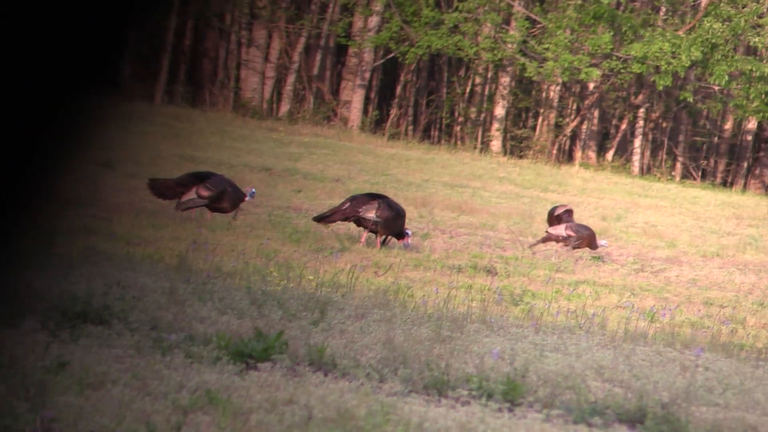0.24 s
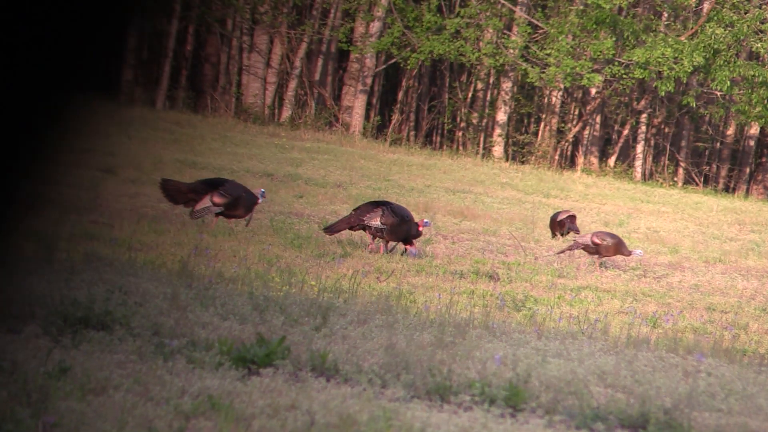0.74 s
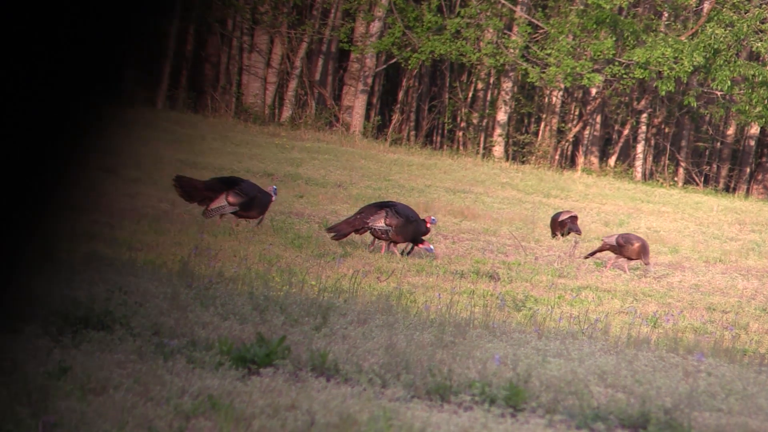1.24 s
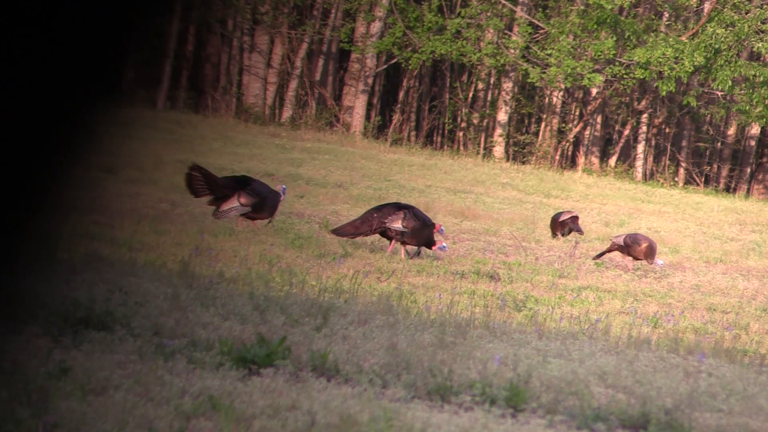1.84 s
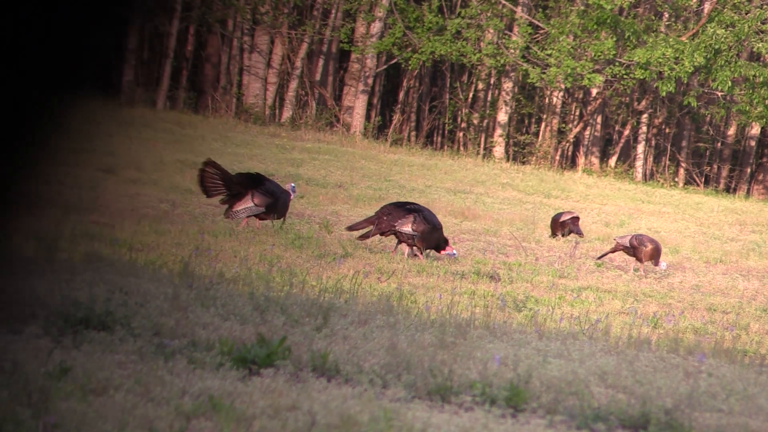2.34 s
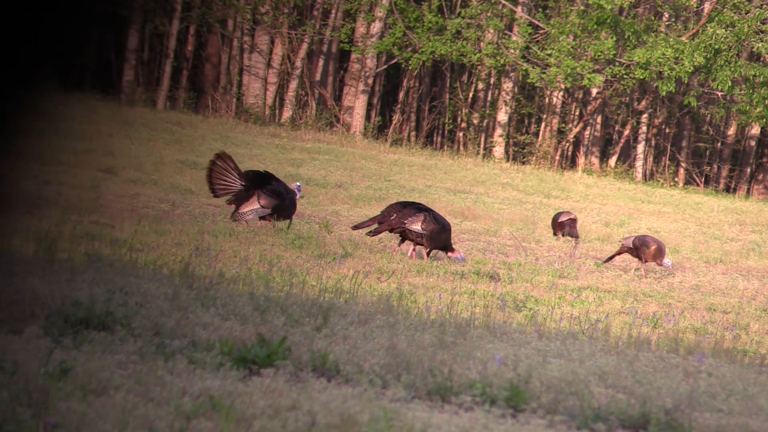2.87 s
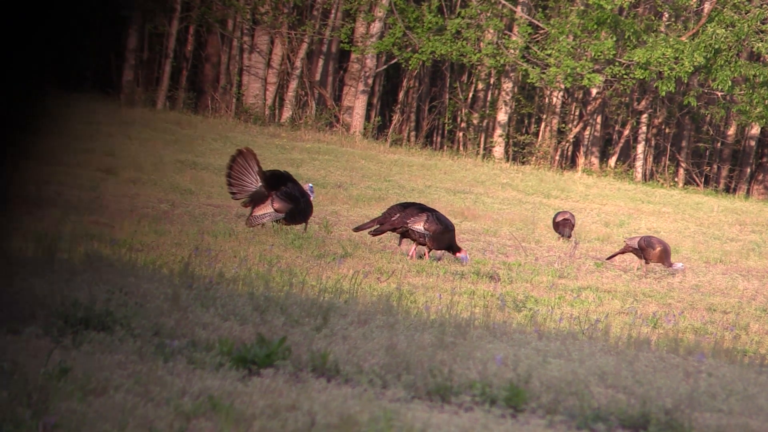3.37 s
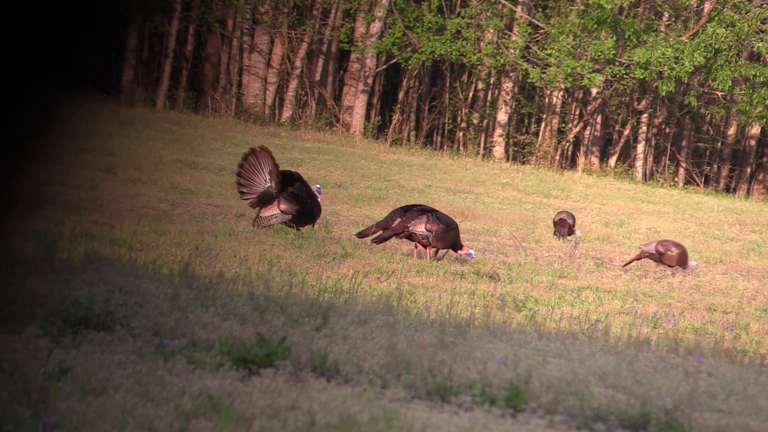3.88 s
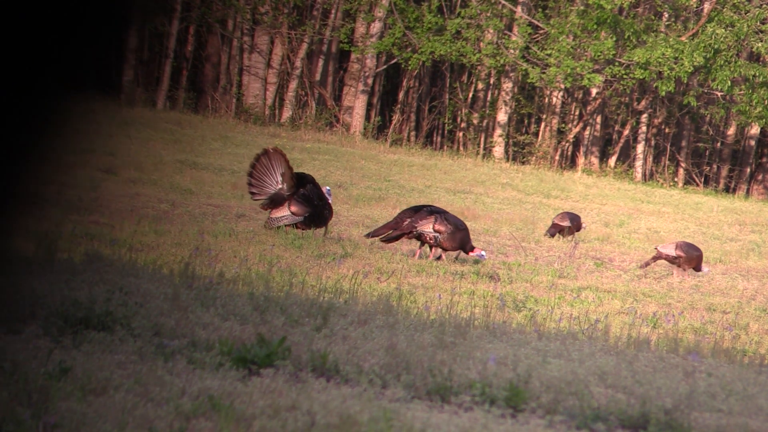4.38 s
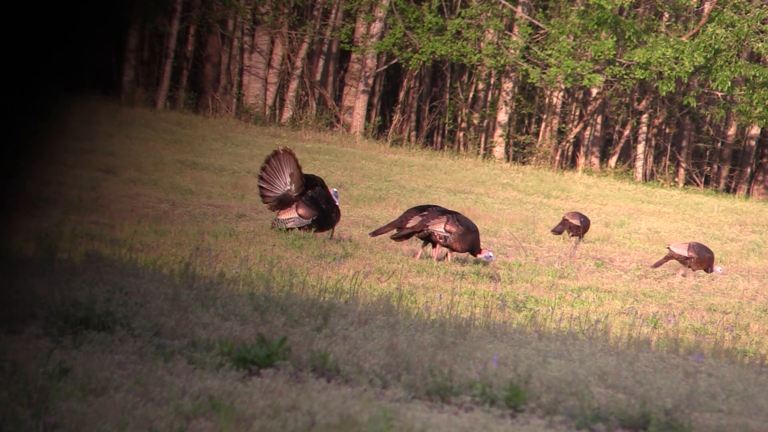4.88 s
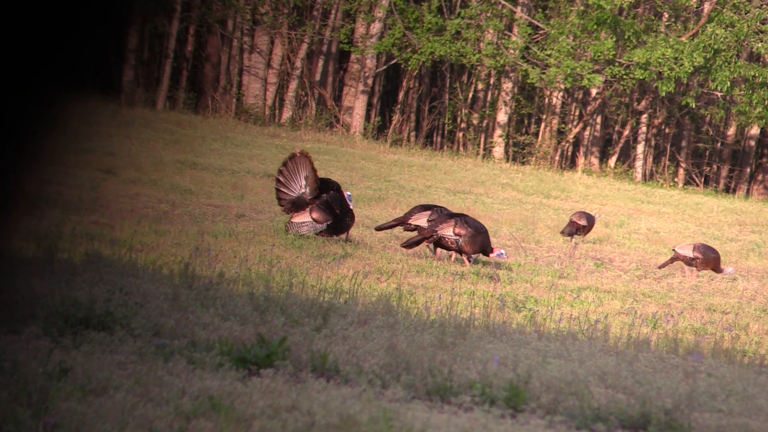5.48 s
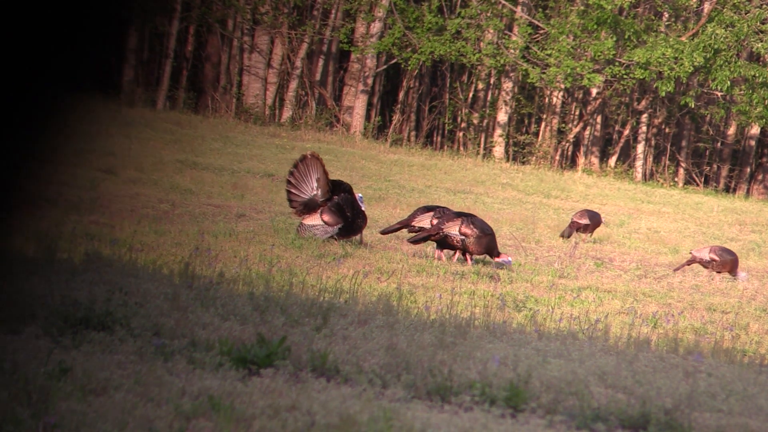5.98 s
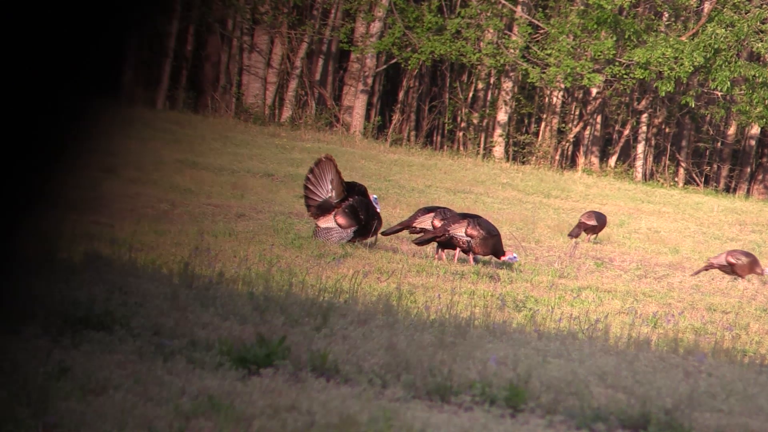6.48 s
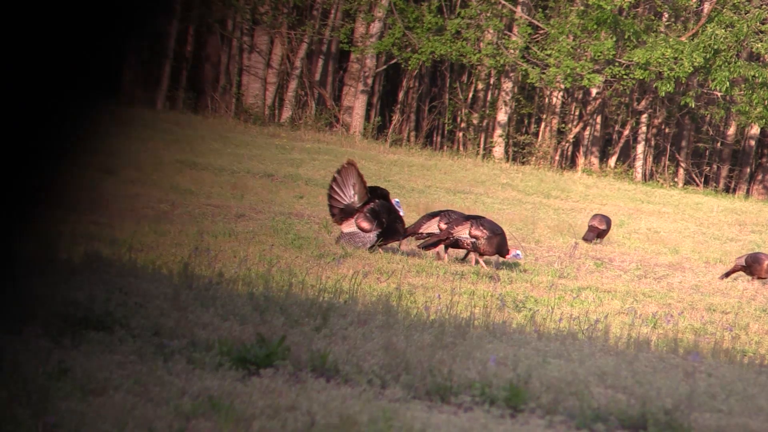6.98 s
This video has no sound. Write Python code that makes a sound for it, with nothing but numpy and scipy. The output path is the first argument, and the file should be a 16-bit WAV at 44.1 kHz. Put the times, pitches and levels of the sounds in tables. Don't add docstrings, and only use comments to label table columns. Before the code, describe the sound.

Quiet rustling and taps, then a loud clattering wooden turkey gobble, a brief two-tone yelp, and faint birds chirping far off.

```python
import sys
import numpy as np
from scipy import signal
from scipy.fft import rfft, irfft
from scipy.io import wavfile

SR = 44100
rng = np.random.default_rng(int(sys.argv[2]) if len(sys.argv) > 2 else 0)


def volts(x):
    e = np.asarray(x, float) / 20
    return 10 ** e


def master(y):
    cut = np.clip(np.atleast_2d(y).T, -1, 1)
    pcm = np.round(cut * 32767)
    wavfile.write(sys.argv[1], SR, pcm.astype(np.int16))


N = 318402
T, HZ = np.arange(N) / SR, np.maximum(np.fft.rfftfreq(N, 1 / SR), 1)


def rms_one(x):
    return x / np.sqrt(np.mean(x ** 2) + 1e-20)


def at_hz(points, hz):
    point_hz, value = np.array(points).T
    return np.interp(np.log(hz), np.log(np.maximum(point_hz, 1)), value)


def drift(rate_hz):
    return rms_one(irfft(rfft(rng.standard_normal(N)) / (1 + (HZ / rate_hz) ** 2), N))


def filtered(x, order, hz, kind):
    return signal.sosfilt(signal.butter(order, hz, kind, fs=SR, output="sos"), x)


def ring(drive, hz, t60_s):
    r, w = volts(-60 / (t60_s * SR)), 2 * np.pi * hz / SR
    return signal.lfilter([0, np.sin(w)], [1, -2 * r * np.cos(w), r * r], drive + 1e-18)


def body(drive, modes):
    click = np.zeros(N)
    click[0] = 1
    rings = [(-1) ** k * volts(db) * ring(click, hz, t60_s) for k, (hz, db, t60_s) in enumerate(modes)]
    response = sum(rings)[:SR // 5]
    return signal.oaconvolve(drive, response[None] / np.linalg.norm(response), axes=1)[:, :N]


def coloured(spectrum, alike):
    mid, side = rfft(rng.standard_normal((2, N))) * volts(at_hz(spectrum, HZ))
    alike = np.clip(alike, -1, 1)
    return rms_one(irfft(np.sqrt(1 + alike) * mid + np.sqrt(1 - alike) * side * [[1], [-1]], N))


def bursts(times_s, levels_db, decay_s):
    clicks = np.zeros(N)
    clicks[(np.array(times_s) * SR).astype(int)] = volts(np.array(levels_db))
    return signal.lfilter([1], [1, -np.exp(-1 / (decay_s * SR))], clicks + 1e-18)


def grit(spread_db, shared):
    sizes = volts(spread_db * np.minimum(rng.exponential(1, N), 5))
    common, left, right = rng.standard_normal((3, N))
    shared = np.clip(shared, 0, 1)
    return rms_one(sizes * (shared * common + (1 - shared) * np.array([left, right])))


# (time [s], peak [dB], low modes [dB], brightness [dB])
CLACKS = [(1.5906, -8.5, -13, -18.5), (1.6419, -4.5, -17, -19), (1.708, -7.5, -10, -23.5),
          (1.7964, -8, -10.5, -18.5), (1.9083, -6, -11, -21), (1.994, -3.5, -9.5, -20),
          (2.098, -8.5, -11.5, -25), (2.176, -8, -12.5, -13), (2.2717, -9, -12.5, -15),
          (2.3352, -10.5, -10, -8.5), (2.432, -13.5, -14, -24.5), (2.4932, -8.5, -22.5, -11.5),
          (2.587, -8.5, -12, -17.5), (2.6411, -10.5, -13.5, -9.5), (2.7254, -10, -19, -25.5),
          (2.7448, -22.5, -19.5, -21), (2.7908, -10.5, -28.5, -13.5), (2.8859, -11.5, -10, -18.5),
          (2.9319, -8, -18, -15), (3.0254, -15.5, -19, -24), (3.077, -6, -13.5, -16.5),
          (3.161, -10.5, -15, -33), (3.187, -24, -19, -24.5), (3.2311, -4.5, -11, -24),
          (4.8975, -30.5, -48, -12.5)]
THIN_WALL_DB = [-3.0, -2.5, -3.0, -3.0, 5.0, -5.0, 5, 6.0, 6.0, -5.0, 2, 5.0, 3.5, 9.0, -1.5, 1.5, 8.0, 1.5,
                1.5, -1.5, 3.0, 4.5, -4.0, 10.0, 0.1]
UPPER_DB = [3.0, 3.0, 1.5, 1.5, 1.5, 3.0, 3.0, 3.0, 1.5, 1.5, -1.5, 1.5, 1.5, 3.0, 1.5, -4, 3.0, 1.5, 1.5,
            -2.5, 1.5, 1.5, -1.5, 3.0, 0]
# (frequency [Hz], level [dB], t60 [s])
LOW_MODES = [(613, -14.5, 0.03), (916, -1, 0.042), (1062, 1.5, 0.0339), (1262.6, 3.5, 0.048)]
# (frequency [Hz], level [dB], t60 [s])
HIGH_MODES = [(1518, -6, 0.044), (1760, -2.5, 0.031), (2275, -6, 0.03), (2604, -1, 0.016),
              (2900, -2, 0.023), (3380, -8.5, 0.016), (4088, -12, .022), (4440, -13, 0.028),
              (4960, -15.5, .03), (7660, -9, 0.012), (8400, -12, 0.0062)]
# (frequency [Hz], density [dB per Hz])
CRACK = [(150, -71.5), (250, -40.5), (421, -27), (710, -24), (1010, -4), (1280, -9.5), (1400, -11.5),
         (2860, -15.5), (3770, -30), (7840, -37.5), (12100, -47), (16000, -64.5)]


def clacks():
    s, high_db, low_db, bright_db = np.transpose(CLACKS)
    low_chatter, high_chatter = grit(3.0, shared=0.92), grit(1.8, shared=0.57)

    def struck(db, chatter, chatter_db, chatter_s, hit_db, hit_s, modes):
        return body(bursts(s, db + chatter_db, chatter_s) * chatter + bursts(s, db + hit_db, hit_s), modes)

    thin_db, upper_db = np.array(THIN_WALL_DB) / 2, np.array(UPPER_DB) / 2
    thick = struck(low_db - thin_db, low_chatter, -2.5, 0.008, 2.0, .0001, LOW_MODES[:3])
    thin = struck(low_db + thin_db, low_chatter, 0.3, 0.006, 7.5, .0001, LOW_MODES[3:])
    middle = struck(high_db - upper_db, high_chatter, -7.5, .011, 0.3, .00005, HIGH_MODES[:3])
    upper = struck(high_db + upper_db, high_chatter, -7.0, .0065, 1.5, .00005, HIGH_MODES[3:])
    low = filtered(thick + thin, 2, [640, 3000], "band")
    high = filtered(middle + upper, 3, [900, 9500], "band")

    crack = bursts(s, high_db + bright_db + 0.5, 0.0093) * coloured(CRACK + [(22000, -99)], 0.68)
    top = filtered(crack, 2, 4500, "high")
    return low + high + filtered(crack, 1, 1300, "high") * volts(12.5) + top * volts(18.5)


# (loudest time [s], squeal [dB], rise [ms], fall [ms], pitch [Hz])
STROKES = [(1.6872, -10, 11.5, 6.5, 1040), (1.763, -12.5, 8.75, 11.1, 1138), (1.8621, -7, 10.8, 9.2, 1038),
           (1.959, -8.5, 10, 7.6, 1052), (2.0548, -7.5, 12, 7.7, 1014), (2.1336, -14.5, 6.0, 5.0, 1010),
           (2.152, -8, 9.0, 8.0, 1070), (2.2274, -6.5, 10.04, 8.3, 1015), (2.3038, -14.5, 9.4, 4.4, 1110),
           (2.3873, -6, 10.2, 10.1, 1020), (2.4679, -12.5, 5.26, 10.0, 1166), (2.5395, -7, 8.6, 6.5, 1030),
           (2.6867, -6.5, 10.1, 14.5, 1001), (2.8274, -10, 5.8, 10.1, 1030),
           (2.9087, -12.5, 6.66, 9.4, 996), (2.9427, -13.5, 9.8, 7.04, 1119),
           (3.0552, -12, 4.72, 11.1, 1013), (3.12, -9, 9.5, 5.8, 1039)]
# (time [s], squeal [dB], half length [ms], pitch [Hz])
CATCHES = [(1.604, -11, 6.85, 960), (1.6316, -6.5, 6.0, 942), (2.118, -19, 4.0, 1030),
           (2.169, -12.5, 5.0, 930), (2.315, -14.5, 7.53, 1060), (2.612, -7.5, 4.5, 1035),
           (2.6303, -13.5, 7.36, 1050), (2.772, -12, 4.22, 975), (2.784, -17, 4.5, 950),
           (2.7996, -17, 7.3, 1260), (2.9732, -13.5, 5.03, 1110), (2.9844, -10.5, 6.0, 1000),
           (3.1364, -20.5, 3.5, 1050), (3.2099, -18, 4.36, 970), (3.267, -8.5, 3.7, 1000),
           (3.2791, -11, 5.0, 990), (3.2935, -10.5, 4.9, 990), (3.3063, -10, 5.33, 980)]
JERKS = [1.6223, 1.6705, 1.748, 1.8439, 1.939, 2.0355, 2.126, 2.2098, 2.367, 2.454, 2.523, 2.669, 2.768,
         2.8196, 2.961, 3.049, 3.1055, 3.2614]
SQUEAL_HZ = 999.3
STROKE_GLIDE, CATCH_GLIDE = .012, .003
RASP_DB, RASP_DB_PER_HZ = -14.5, 0.0732
STUCK_S, STUCK_DB = .012, -14
THIRD_PEAK_HZ, THIRD_WIDTH_HZ, THIRD_GAIN = 2830, 100, .2


def strokes():
    squeal, rasp, pitch, weight = np.zeros(N), np.zeros(N), np.zeros(N), np.full(N, 1e-9)
    drags = [(*row, STROKE_GLIDE) for row in STROKES]
    drags += [(s, db, half_ms, half_ms, hz, CATCH_GLIDE) for s, db, half_ms, hz in CATCHES]
    for s, db, rise_ms, fall_ms, hz, glide in drags:
        rasp_db = RASP_DB + RASP_DB_PER_HZ * (hz - SQUEAL_HZ)
        u = (T - s) * 1000 / np.where(T < s, rise_ms, fall_ms)
        near = np.exp(-.69 * np.minimum(np.abs(u) ** 2.1, 30))
        squeal += (volts(db) * near) ** 2
        rasp_swell = 1 / (1 + (u / 1.49) ** np.where(u < 0, 8, 4))
        rasp += (volts(db + rasp_db - 4.4 * np.clip(u, -2, 9)) * rasp_swell) ** 2
        pitch += near * hz * (1 + glide * (np.exp(-3 * np.clip(u, -1, 3)) - 1))
        weight += near
    turns = np.cumsum((pitch + 1e-6) / weight * (1 + .012 * drift(150))) / SR
    third = .04 + THIRD_GAIN * np.exp(-((3 * pitch / weight - THIRD_PEAK_HZ) / THIRD_WIDTH_HZ) ** 2)

    free = volts(sum(np.interp(T, [s - STUCK_S, s - .001, s + .001], [0, STUCK_DB, 0]) for s in JERKS))
    squeal, rasp = squeal * free ** 2, rasp * free ** 2
    tone = np.sin(2 * np.pi * turns) + 0.13 * np.sin(4 * np.pi * turns + 1)
    tone = tone + third * np.sin(6 * np.pi * turns)
    slips = np.sqrt(rasp) * np.exp(-3.5 * (turns % 1)) * grit(2.3, shared=.5)
    wood = volts(1.0) * body(slips, HIGH_MODES) + volts(5.0) * body(slips, LOW_MODES)
    hiss = volts(-0.5) * np.sqrt(rasp) * coloured(CRACK + [(22000, -99)], 0.57)
    hiss = hiss + volts(2.5) * filtered(hiss, 2, 9000, "high")
    return volts(1.5) * np.sqrt(squeal) * volts(2.9 * drift(100)) * tone + wood + hiss


HUM_HZ, HUM_START_HZ = 427, 967
SHAKE_END_S, DAMPED_AFTER_S, FULL_SWING_S = 3.298, 0.0021, .058
HUM_DB, HUM_LOSS_DB, SCRAPE_DB = -41, 21.5, -0.5
SQUEAK_DB, SQUEAK_LOSS_DB = -22, 12
SQUEAK_HZ, SQUEAK_LOSS_HZ = 1380, 200
GRAB_S, GRAB_HZ, GRAB_DB = .006, 930, -17


def hum():
    out, scrape_db = np.zeros(N), []
    shut_s = np.sort(np.append(np.array(CLACKS)[:, 0], SHAKE_END_S))
    for s in JERKS:
        length_s = shut_s[shut_s > s][0] + DAMPED_AFTER_S - s
        short = max(1 - length_s / FULL_SWING_S, 0)
        squeak_db = SQUEAK_DB - SQUEAK_LOSS_DB * short
        scrape_db.append(squeak_db + SCRAPE_DB)
        t = np.arange(int(length_s * SR)) / SR
        ends = np.minimum(t / 0.001, 1) * np.minimum((length_s - t) / 0.0038, 1)

        cavity = np.cumsum(HUM_HZ + (HUM_START_HZ - HUM_HZ) * np.exp(-t / 0.0065)) / SR
        low = volts(HUM_DB - HUM_LOSS_DB * short + 4.0) * (1 + 3.0 * np.exp(-t / 0.0027))
        low = low * np.sin(2 * np.pi * cavity)

        drop_hz = SQUEAK_HZ - SQUEAK_LOSS_HZ * short - SQUEAL_HZ
        squeak = np.cumsum(SQUEAL_HZ + drop_hz * np.exp(-np.maximum(t - GRAB_S, 0) / 0.007)) / SR
        high = volts(squeak_db) * np.exp(-((t - GRAB_S - .003) / 0.005) ** 2) * np.sin(2 * np.pi * squeak)

        slow = 2 * np.pi * GRAB_HZ * t
        grab = volts(GRAB_DB - SQUEAK_LOSS_DB * short) * np.exp(-(t / GRAB_S) ** 4)
        high += grab * (np.sin(slow) + .8 * np.sin(2 * slow) + .4 * np.sin(3 * slow))
        out[int(s * SR):][:len(t)] += ends * (low + high)
    scrape = bursts(JERKS, scrape_db, 0.016) * grit(2.7, shared=0.95)
    return out + body(scrape, HIGH_MODES + LOW_MODES)


# (time [s], slip rate [Hz], level [dB])
YELP = [
    (5.074, 1058, -66.5),
    (5.083, 1009, -11),
    (5.087, 900, -6),
    (5.093, 752.7, -11.5),
    (5.116, 743, -14),
    (5.134, 788, -11),
    (5.141, 914.5, -8),
    (5.15, 960, -17),
    (5.165, 1003, -44.5),
]
# (frequency [Hz], gain [dB])
YELP_COLOUR = [(800, 3), (1100, -13.5), (1500, -8), (2300, -10), (3000, -12), (4500, -24.5), (5700, -37.5),
               (6230, -29), (6700, -40.5), (7500, -29.5), (9300, -48), (11000, -44)]
SLOWEST_HZ, OVER_DB, OVER_DB_PER_HZ, UNDER_DB, UNDER_FALL_DB = 747, -0.1, -0.0743, -10.5, 2.1
UNEVEN_DB = 4.5


def yelp():
    s, *columns = np.transpose(YELP)
    part = slice(int(s[0] * SR), int(s[-1] * SR))
    hz, db = [np.interp(T[part], s, column) for column in columns]
    faster_hz = np.maximum(hz - SLOWEST_HZ, 0)
    over_db = OVER_DB + OVER_DB_PER_HZ * faster_hz
    under_db = UNDER_DB - UNDER_FALL_DB * np.sqrt(faster_hz)
    turns = np.cumsum(hz * (1 + 0.0022 * drift(200)[part])) / SR
    first, upper = np.zeros(N), np.zeros(N)
    first[part] = np.sqrt(2) * volts(db) * np.sin(2 * np.pi * turns)
    uneven = np.cos(np.arange(43) ** 2) * (np.arange(43) > 15)
    for k in range(4, 43):
        level_db = db + over_db + at_hz(YELP_COLOUR, hz * k / 3) + UNEVEN_DB * uneven[k]
        if k % 3:
            level_db = level_db + under_db * max(1 - k / 24, 0)
        upper[part] += np.sqrt(2) * volts(level_db) * np.sin(2 * np.pi * turns * k / 3 - 0.33 * k)
    rasp_colour = [(900, -29), (2500, -7.0), (4300, -1.5), (5300, -13.0), (6250, -3.5), (7600, -9.0),
                   (10000, -17), (12500, -22), (16000, -50)]
    rasp = coloured(rasp_colour, 0.92)[0, part]
    upper[part] += volts(db + over_db - 19.0) * np.exp(-2.5 * (turns % 1)) * rasp
    return -(first + 0.85 * upper + 0.18 * body(upper[None], HIGH_MODES)[0])


# (frequency [Hz], level [dB], t60 [s])
LONG_RINGS = [(990, -72, 0.31), (1162, -50, 0.32), (1166, -48.5, 0.18), (2246, -41.5, 0.14)]
# (frequency [Hz], level [dB], t60 [s])
YELP_RINGS = [(775, -66.5, 1.2), (985, -57.5, 0.43), (1516, -67, .7), (2003, -52.5, 1.46),
              (2025, -45.5, 0.98), (2750, -50, .12)]


def lingering_rings(gobble, note):
    late = T > 4
    gobble_drive, yelp_drive = gobble[0] * ~late, note + 6.0 * gobble[0] * late
    rings = sum(volts(db - 13.5) * ring(gobble_drive, hz, t60_s) for hz, db, t60_s in LONG_RINGS)
    for k, (hz, db, t60_s) in enumerate(YELP_RINGS):
        rings += (-1) ** k * volts(db - 18) * ring(yelp_drive, hz, t60_s)
    return rings * volts(2 * drift(14))


# (frequency [Hz], left over right [dB])
BOX_PAN = [(60, 5), (400, 1.5), (830, 2.5), (1000, 7), (1260, 13), (1550, -1), (2000, -1), (2600, 11),
           (4200, 3), (15000, 1)]
# (frequency [Hz], left lead [rad])
BOX_LEAD = [(450, .2), (750, .9), (1030, .6), (1210, 2.1), (1400, -.2), (1950, -.3), (2350, -2.2),
            (2930, 1.7), (3600, 1.2), (4800, -2.2), (7150, -.1)]


def from_the_left(x):
    half = volts(at_hz(BOX_PAN, HZ) / 2) * np.exp(.5j * at_hz(BOX_LEAD, HZ))
    early = 64
    ports = np.roll(irfft(np.array([half, 1 / half]), N), early, axis=1)[:, :256]
    ports = ports * np.minimum(np.arange(256) / 40, 1) * np.hanning(512)[256:]
    return signal.oaconvolve(x, ports, axes=1)[:, early:N + early]


ECHO_DB, ECHO_T60_S = -33.5, .45


def tree_echo(x):
    t = T[:SR // 2]
    tail = rng.standard_normal((2, len(t))) * volts(-60 * t / max(ECHO_T60_S, .05)) * np.minimum(t / .03, 1)
    tail = filtered(tail, 1, [250, 3500], "band")
    return volts(ECHO_DB) * signal.oaconvolve(x[None], tail / np.linalg.norm(tail[0]), axes=1)[:, :N]


# (time [s], peak [dB], frequency [Hz])
KNOCKS = [
    (0.374, -38.5, 418),
    (0.504, -40.5, 780),
    (0.758, -53.5, 775),
    (0.997, -48, 778),
    (1.178, -50.5, 1177),
    (1.521, -44, 920),
    (4.544, -51.5, 907),
    (4.896, -37, 916),
    (5.436, -54, 1000),
    (5.668, -52, 1150),
]
# (time [s], peak [dB], frequency [Hz], t60 [s])
THUDS = [(0.371, -44, 196, 0.052), (1.591, -26, 182, 0.11), (1.591, -24, 277, 0.03),
         (.92, -41.5, 360, .017), (3.47, -47.5, 170, 0.14), (4.897, -38.5, 165, 0.097),
         (.374, -41.5, 554, .05), (3.316, -30, 1152, 0.23), (3.316, -46, 985, 0.41), (4.9, -48, 2100, 0.12),
         (4.925, -47, 2040, .12), (4.905, -52, 4150, .12)]
# (time [s], peak [dB])
TICKS = [(0.2525, -56), (0.27, -50), (0.48, -53), (1.2432, -38.5), (1.5524, -34.5), (1.577, -26.5),
         (3.413, -48), (3.471, -40), (3.733, -47), (3.829, -44), (3.964, -52), (4.243, -51), (4.281, -48),
         (4.38, -53), (4.578, -53), (4.7693, -47), (6.0258, -46.5), (6.1742, -47), (6.39, -47),
         (6.4265, -38), (6.51, -50), (6.6663, -44), (6.752, -47), (6.838, -41), (6.8444, -37)]
# (frequency [Hz], level [dB], t60 [s])
CREAK_MODES = [(2133, -6, 0.0161), (2630, -12, 0.014), (3052, -6, 0.0074)]
KNOCK_T60_S, TICK_DECAY_S = .07, .0026
CREAK_S, CREAK_DB, CREAK_RISE_S, CREAK_FALL_S = 6.255, -48, .045, 0.026


def handling():
    knocks = np.zeros(N)
    for s, db, hz, t60_s in [(*row, KNOCK_T60_S) for row in KNOCKS] + THUDS:
        double_hit = bursts([s], [-9], .0001) + bursts([s + .004], [-14], .0001)
        knocks += volts(db) * ring(double_hit, hz, max(t60_s, .005))
    knocks = filtered(knocks, 2, 110, "high")
    s, db = np.array(KNOCKS)[:, :2].T
    puff_colour = [(100, -21.5), (400, -2.5), (2000, -6.5), (4000, -30.5)]
    puffs = bursts(s, db - 4.0, 0.0038) * coloured(puff_colour, .8)

    s, db = np.transpose(TICKS)
    tick_colour = [(300, -18), (2500, 3.5), (7000, -6.5), (11000, -12), (16000, -30)]
    ticks = bursts(s, db - 3.0, TICK_DECAY_S) * coloured(tick_colour, 0.6)

    away = (T - CREAK_S) / np.where(T < CREAK_S, CREAK_RISE_S, CREAK_FALL_S)
    creak_level = volts(CREAK_DB - 6 * np.minimum(away ** 2, 20))
    creak = body(creak_level * grit(3.0, shared=0.55), CREAK_MODES)
    return (knocks + puffs + ticks + creak) * volts(np.array([[1.5], [-1.5]]))


# (time [s], length [s], from [Hz], to [Hz], level [dB])
CHIRPS = [
    (4.552, .024, 2750, 3250, -56),
    (4.59, 0.031, 2620, 3450, -52.5),
    (4.644, 0.047, 3340, 2315, -48),
    (4.707, 0.048, 2580, 2455, -49),
    (6.334, .065, 2880, 2680, -55.5),
    (6.958, .037, 1290, 2000, -53),
    (7.045, 0.074, 1910, 1305, -54.5),
]
# (time [s], length [s], middle [Hz], level [dB])
WARBLES = [
    (4.812, 0.088, 3020, -56.5),
    (6.495, 0.044, 2900, -62),
]
# (time [s], pitch [Hz], level [dB])
WHISTLES = [
    [(6.975, 1160, -60), (7.001, 1438, -39), (7.04, 1320, -45), (7.07, 1140, -61)],
]
CHIRP_FADE_DB = 12.5
WARBLE_PERIOD_S, WARBLE_SWING_HZ, WARBLE_SAG_HZ_PER_S = .04, 419, 3000
WARBLE_SWING_DB = 5.5


def songs():
    notes = []
    for s, length_s, from_hz, to_hz, db in CHIRPS:
        middle = (s + length_s / 2, (from_hz + to_hz) / 2, db)
        notes.append([(s, from_hz, db - CHIRP_FADE_DB), middle, (s + length_s, to_hz, db - CHIRP_FADE_DB)])
    for s, length_s, hz, db in WARBLES:
        t = np.linspace(0, length_s)
        swing = np.cos(2 * np.pi * t / WARBLE_PERIOD_S)
        pitch = hz + WARBLE_SWING_HZ * swing - WARBLE_SAG_HZ_PER_S * t
        notes.append(np.transpose([s + t, pitch, db - WARBLE_SWING_DB * swing]))
    return notes + WHISTLES


def birds():
    out = np.zeros(N)
    for note in songs():
        s, hz, db = np.transpose(note)
        part = slice(int(s[0] * SR), int(s[-1] * SR))
        ends = signal.windows.tukey(part.stop - part.start, .2)
        turns = np.cumsum(np.interp(T[part], s, hz)) / SR
        out[part] += np.sqrt(2) * ends * volts(np.interp(T[part], s, db)) * np.sin(2 * np.pi * turns)
    echo = [np.roll(out, int(lag_s * SR)) for lag_s in (.013, .021)]
    return out + volts(-9.5) * np.array(echo)


# (time [s], level [dB])
RUSTLE = [(0, -68), (.46, -72), (.52, -51), (.64, -53), (1.1, -51.5), (1.16, -48), (1.28, -54),
          (3.4, -51.5), (3.88, -56.5), (3.941, -61), (5.2, -57.5), (6.02, -61), (6.22, -51.5),
          (6.449, -54.5), (6.85, -52), (6.929, -61), (7.22, -56)]
# (time [s], extra [dB], rise [s], fall [s])
RUBS = [
    (.55, 5, .6, .3),
    (1.16, 7.5, 0.077, 0.072),
    (3.88, 7.5, 0.28, .07),
    (6.25, 5, .2, 0.253),
    (6.85, 7, 0.12, 0.073),
]
# (frequency [Hz], density [dB per Hz])
SWISH = [(150, -37), (250, -5), (396, -3.5), (458, -6.5), (901, -7.5), (1050, -8.5), (2710, -7.5),
         (4500, -21), (5850, -42), (9900, -120)]
# (frequency [Hz], density [dB per Hz])
HISS = [(2350, -31.5), (4000, -3), (5310, -1.5), (8600, 2.5), (9770, -4.5), (11600, -3.5), (16000, -22)]
# (frequency [Hz], density [dB per Hz])
AIR = [(15, -65.5), (25, -36), (51, -6), (76, 0), (238, -5.5), (265, -11.5), (357, -6), (398, -11.5),
       (597, -9), (1720, -15.5), (2320, -17.5), (7650, -28), (16400, -41.5)]
# (frequency [Hz], left-right likeness [-1..1])
LIKENESS = [(60, 0.41), (130, 1), (290, -0.11), (640, -0.16), (1410, -0.19), (3100, 0.51), (6820, 0.37),
            (15000, 0.99)]
AIR_DB, HISS_BELOW_DB = -52, -13


def field():
    swish_db = np.interp(T, *np.transpose(RUSTLE))
    rub_db = sum(np.interp(T, [s - rise_s, s, s + fall_s], [0, db, 0]) for s, db, rise_s, fall_s in RUBS)
    hiss_db = swish_db + HISS_BELOW_DB + rub_db
    alike = at_hz(LIKENESS, HZ)
    snaps = (rng.random(N) < 22.0 / SR) * rng.exponential(0.93, N)
    crackle = (1 + signal.lfilter([1], [1, -.993], snaps)) * volts(2.0 * drift(25))
    air = volts(AIR_DB - 2.0 + .5 * drift(5.4)) * coloured(AIR, alike)
    swish = volts(swish_db - 2.5 + 1.0 * drift(15)) * np.sqrt(crackle) * coloured(SWISH, alike)
    hiss = volts(hiss_db) * crackle * coloured(HISS, alike)
    return air + (swish + hiss) * volts(np.array([[1.2], [-1.2]]))


def scene():
    gobble = filtered(clacks() + strokes() + hum(), 2, [220, 12500], "band")
    gobble, note = filtered(gobble, 4, 14500, "low"), filtered(yelp(), 4, 14500, "low")
    box = from_the_left(gobble + note + lingering_rings(gobble, note))
    return box + handling() + birds() + field() + tree_echo(gobble[0] + note[0])


def low_pass(x):
    return signal.sosfilt(signal.butter(12, 16500, fs=SR, output="sos"), x)


def record(dry):
    rounded = dry / (1 + np.abs(dry) ** 5) ** (1 / 5)
    return low_pass(rounded)


dry = scene()
out = record(dry)
master(out)
```